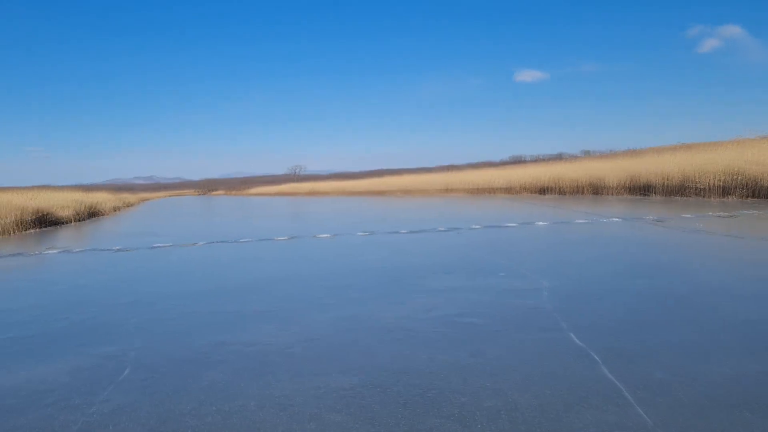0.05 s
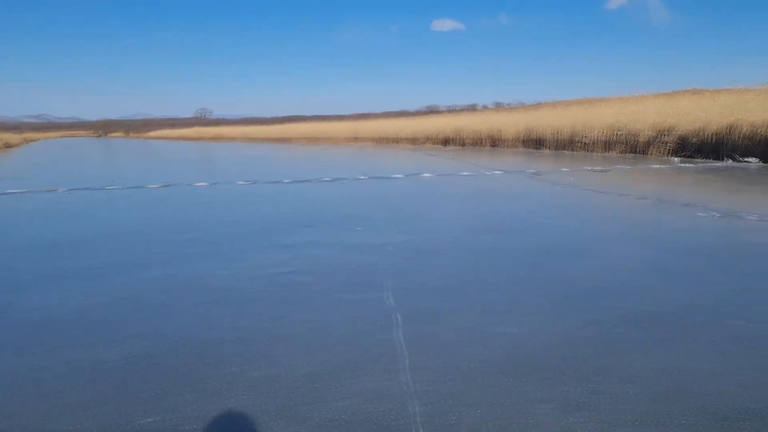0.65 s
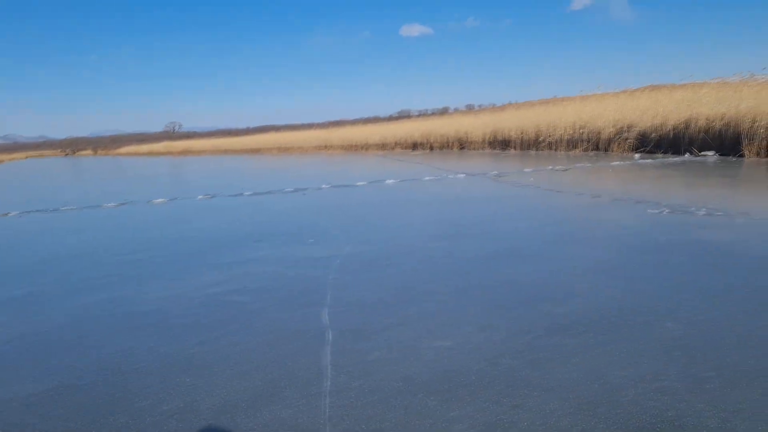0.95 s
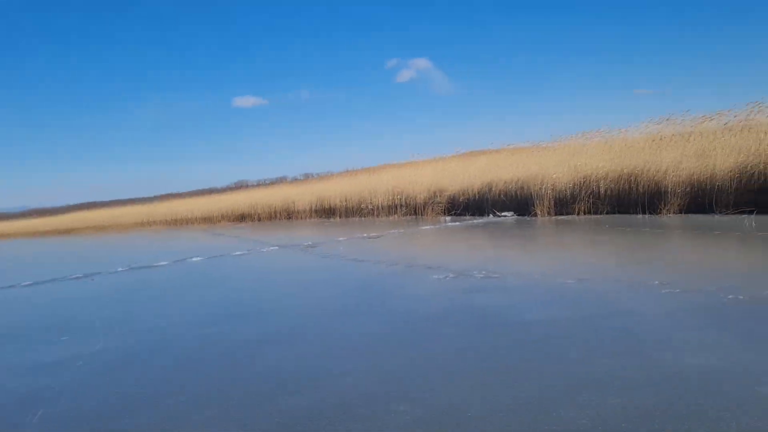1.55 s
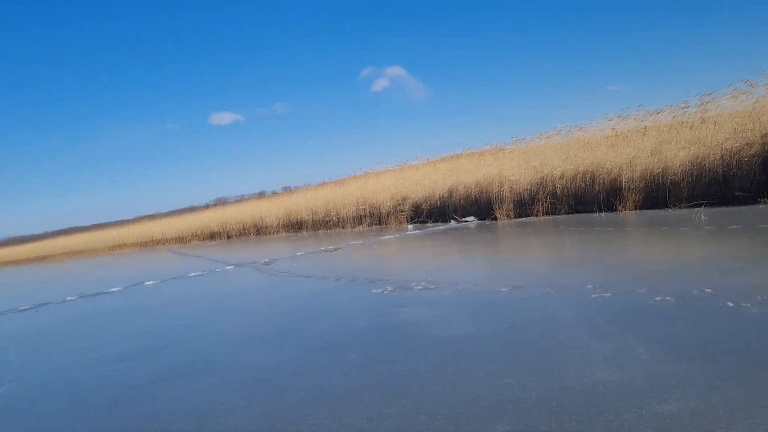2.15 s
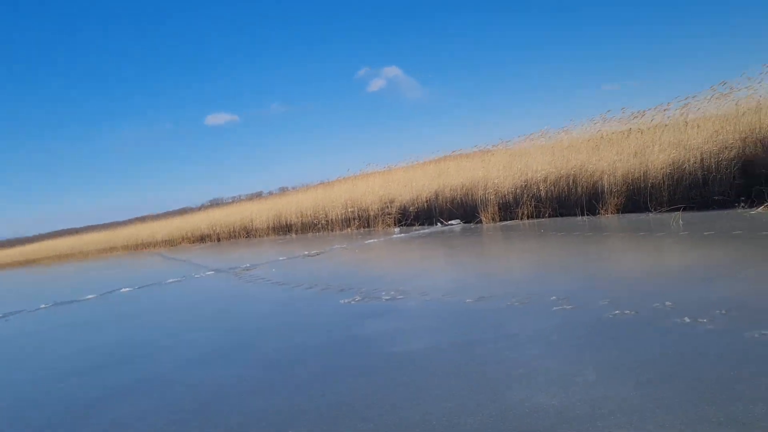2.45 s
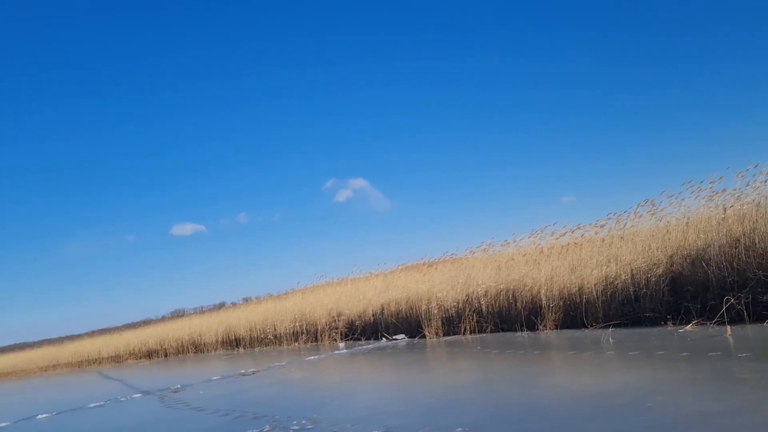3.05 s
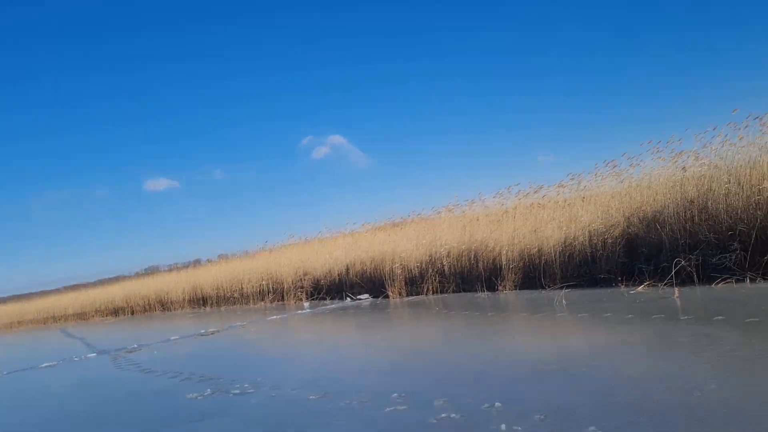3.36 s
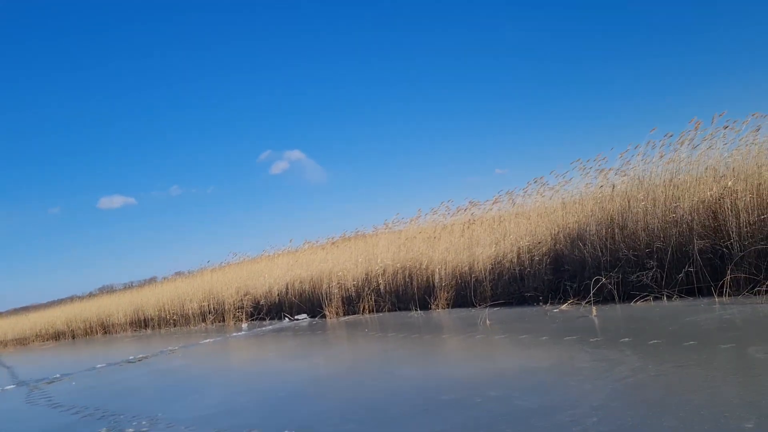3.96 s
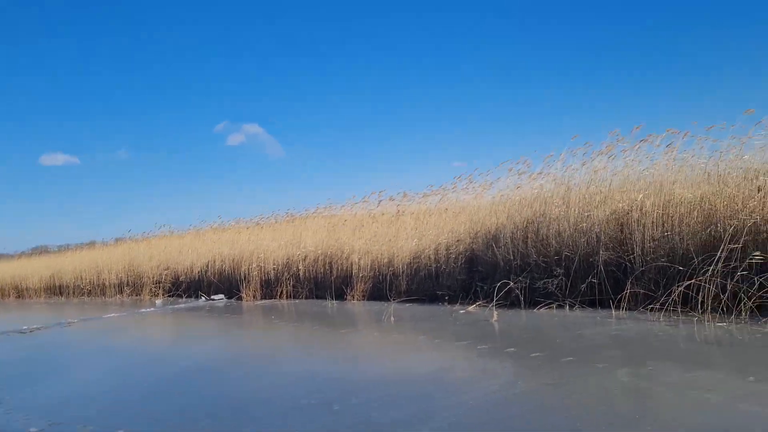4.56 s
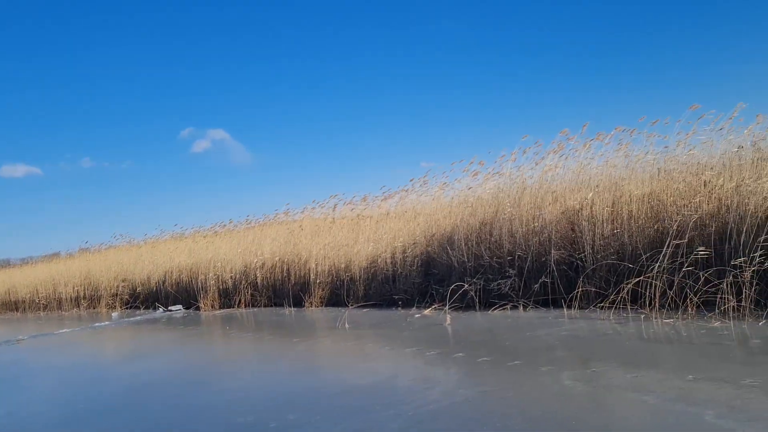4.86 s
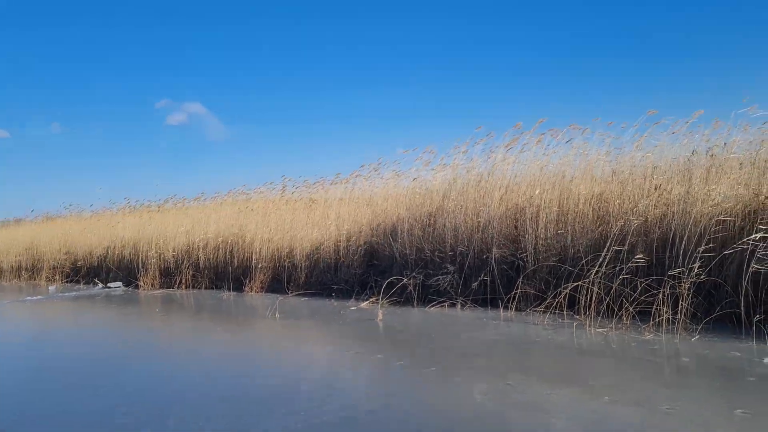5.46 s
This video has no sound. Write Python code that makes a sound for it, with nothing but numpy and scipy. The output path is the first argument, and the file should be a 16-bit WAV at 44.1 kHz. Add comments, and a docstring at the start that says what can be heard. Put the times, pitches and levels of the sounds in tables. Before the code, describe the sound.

Low wind rumbles unevenly on the microphone from the start, with soft thumps around 0.2 and 0.4 seconds, while a nylon jacket swishes close by over a faint open-air hiss. At 1.7 seconds a long-handled tool chops into thin ice: a sharp, loud crack with a crunch and a short, hollow ring. The wind eases, leaving quiet cloth brushes. From about 2.8 to 3.1 seconds the blade bites in a quick run of bright, brittle snaps, loudest at 2.9, scattering small splinters. A sleeve rasps and squeaks softly around 3.5 seconds. The second sharp chop lands at 3.7 seconds, followed at once by a brief hollow note from the ice sheet. Stronger gusts buffet the microphone from 3.9 to 4.6 seconds, thumping hardest near 4.1. Lighter rumble, faint jacket rustles and tiny squeaks continue until about 5.5 seconds.

```python
"""A long-handled tool chops twice into the thin ice of a frozen lake: the edge fractures, the sheet groans
and the impact rings the hollow-sounding modes of the shaft. Between the chops the blade bites and
scrapes, scattering splinters. A nylon jacket swishes, rasps and squeaks by friction with each swing.
Turbulent gusts buffet the two microphone ports over a faint hiss of open air."""
import sys
import numpy as np
from scipy import signal
from scipy.io import wavfile

SR = 44100
rng = np.random.default_rng(int(sys.argv[2]) if len(sys.argv) > 2 else 0)


def dump_mix(stems):
    """Bounce the given channels to the path in sys.argv[1] as a 16-bit WAV at rate SR."""
    frames = np.atleast_2d(stems).T  # one column per channel
    limited = np.clip(frames, -1, 1)  # hard clip at full scale
    pcm = np.round(limited * 32767).astype(np.int16)
    wavfile.write(sys.argv[1], SR, pcm)


N = 242991
T = np.arange(N) / SR
SNAP_RISE_S = 0.0003
RASP_BAND_HZ = [1470, 2600]
# Resonances of splintering ice: centre_hz, width_hz, gain_db
SPLINTER_RESONANCES = [(1000, 600, -8), (1597, 220, 1), (1930, 490, 0), (2600, 1040, -3), (3130, 550, -3.5),
                       (4150, 630, -7), (4800, 770, -10), (6300, 760, -11.5), (7900, 850, -13),
                       (12300, 10000, -21.5)]


def from_db(db):
    """Amplitude ratio of a level in decibels."""
    return 10 ** (np.asarray(db) / 20)


def rms_one(x):
    """Normalisation to unit mean power."""
    return x / np.sqrt(np.mean(x ** 2) + 1e-20)


def in_time(rows):
    """Linear interpolation of each column of a curve at every sample."""
    times, *columns = np.transpose(rows)
    return [np.interp(T, times, column) for column in columns]


def cut(x, hz, kind, order=2):
    """Butterworth filter."""
    sections = signal.butter(order, np.clip(hz, 10, .45 * SR), kind, fs=SR, output="sos")
    return signal.sosfilt(sections, x)


def pan(db):
    """Left and right gains for a level difference."""
    return from_db(np.array([db, -db]).reshape(2, -1) / 2)


def at_ports(x, left_late_s, pan_db):
    """Path difference: a source to one side reaches one port earlier and louder."""
    delays_s = max(left_late_s, 0), max(-left_late_s, 0)
    return np.array([np.roll(x, round(s * SR)) for s in delays_s]) * pan(pan_db)


def drift(rate_hz, step=40):
    """Low-passed noise: a slow random fluctuation of rms 1."""
    r = np.exp(-2 * np.pi * step * rate_hz / SR)
    slow = signal.lfilter([1], [1, -2 * r, r * r], rng.standard_normal(N // step + 2002))[2000:]
    return np.interp(np.arange(N) / step, np.arange(len(slow)), rms_one(slow))


def coloured(spectrum):
    """Noise shaped in half-octave bands, uncorrelated in the two channels; rms 1."""
    edges = 22 * 2 ** np.arange(0, 10, .5)
    hz, db = np.transpose(spectrum)
    white, out = rng.standard_normal((2, 2, N)), 0
    for k, (low, high) in enumerate(zip(edges, edges[1:])):
        gain = from_db(np.interp(np.log(low * high) / 2, np.log(hz), db))
        out += gain * cut(white[k % 2], [low, high], "band")
    return rms_one(out)


def ring(clicks, hz, t60):
    """Damped oscillator: a unit impulse starts a decaying sine of height 1."""
    r, w = np.exp(-np.log(1000) / (t60 * SR)), 2 * np.pi * hz / SR
    return signal.lfilter([0, np.sin(w)], [1, -2 * r * np.cos(w), r * r], clicks + 1e-18)


def resonate(x, resonances):
    """Broad resonators in parallel, signs alternating."""
    out = 0
    for k, (hz, width, db) in enumerate(resonances):
        r = np.exp(-np.pi * width / SR)
        poles = [1, -2 * r * np.cos(2 * np.pi * hz / SR), r * r]
        out += (-1) ** k * from_db(db) * (1 - r * r) / 2 * signal.lfilter([1, 0, -1], poles, x + 1e-18)
    return out


def swell(s, rise, decay, hold=0):
    """Exponential rise to 1 at time s, an optional hold, then exponential decay."""
    return np.exp(-np.clip(np.maximum((s - T) / rise, (T - s - hold) / decay), 0, 40))


def stroke(s, half_length):
    """Gaussian envelope of a movement that speeds up until time s and slows again."""
    return np.exp(-np.minimum(((T - s) / half_length) ** 2 / 2, 40))


def snap(s, decay, resonances):
    """Transient excitation: a sudden noise burst drives resonances; rms about 1 at its peak."""
    shape = swell(s, SNAP_RISE_S, decay)
    burst = resonate(shape * rng.standard_normal(N), resonances)
    return burst * np.sqrt(np.sum(shape ** 2) / np.sum(burst ** 2))


def air(gain_db=6):
    """Noise floor: the open air and the microphone give a faint broadband hiss."""
    # Hiss spectrum: frequency_hz, density_db
    spectrum = [(30, 2), (70, -14), (200, -24), (420, 6), (800, -7), (1200, -10.5), (3000, -9.5),
                (5500, -8.5), (7800, -6.5), (9000, -13), (11700, -5), (16000, -6.5)]
    # Course of the hiss: time_s, level_db
    levels = [(0.0, -55.5), (0.31, -57.5), (0.95, -58.5), (1.61, -57.5), (1.89, -59.5), (2.82, -62),
              (3.01, -54), (3.24, -59), (3.58, -56), (3.76, -61), (4.5, -61), (4.76, -62.5), (5.22, -58.5),
              (5.51, -60)]
    return from_db(in_time(levels)[0] + gain_db) * coloured(spectrum)


def flow_strength(upper, breeze_upper_db=-12, attack_s=0.0047, release_s=0.015):
    """Incoherent sum: breeze and gusts add in energy at each port, for the low or the upper rumble."""
    # Breeze between gusts: time_s, level_db
    breeze = [(0.0, -33.5), (0.36, -35), (0.62, -41.5), (0.96, -61), (1.18, -38.5), (1.43, -38),
              (1.78, -39.5), (2.13, -65), (2.33, -46.5), (2.36, -67.5), (2.63, -67.5), (3.0, -35.5),
              (3.46, -51), (3.66, -44.5), (3.84, -31.5), (4.3, -26), (4.55, -34.5), (4.62, -40.5),
              (4.77, -50.5), (5.0, -40.5), (5.51, -47)]
    # Gusts on the ports: start_s, hold_s, level_db, upper_relative_db, left_minus_right_db
    gusts = [(0.094, 0.094, -30.5, -5.5, -6), (0.35, 0.066, -32, -6, -3.5), (0.566, 0.009, -32.5, -20, -15),
             (0.691, 0.16, -39.5, -39, -6.5), (0.99, 0.011, -37, -11, -10), (1.087, 0.0068, -33.5, -34, -3),
             (1.312, 0.089, -31, -8, -6.5), (1.537, 0.023, -27, -21, 3), (1.872, 0.099, -41.5, -9.5, -1.5),
             (2.105, 0.018, -44.5, -17, -9.5), (2.828, 0.0082, -35.5, -8.5, 1),
             (3.016, 0.18, -35.5, -33, 0.5), (3.301, 0.017, -48, -23, -11), (3.891, 0.11, -33.5, -7, 0),
             (4.055, 0.075, -27, 2, -5), (4.21, 0.13, -33.5, -0.5, 0.5), (4.381, 0.12, -31, -0.5, 1),
             (4.535, 0.039, -34, -5, 4), (4.811, 0.064, -33.5, -14.5, 0.5), (5.049, 0.06, -35, -12, 3.5),
             (5.232, 0.12, -30, -16, -3.5)]
    power = (from_db(in_time(breeze)[0] + upper * breeze_upper_db) * pan(-2.5)) ** 2
    for s, hold, db, upper_db, pan_db in gusts:
        power += (from_db(db + upper * upper_db) * pan(pan_db) * swell(s, attack_s, release_s, hold)) ** 2
    return np.sqrt(power)


def wind(gain_db=1, puffs_per_s=45, puff_decay_s=0.014, steady=0.17, split_hz=240, port_edge_hz=28.6):
    """Turbulent pressure: each port rumbles with its own puffs, which start at once and die away."""
    # Rumble spectrum: frequency_hz, density_db
    spectrum = [(22, -5), (60, 3.5), (100, 1.5), (180, -11.5), (310, -1), (420, -4), (560, -39), (800, -79),
                (1200, -62), (2500, -57.5)]
    hits = (rng.random((2, N)) < puffs_per_s / SR) * rng.uniform(0.34, 1, (2, N))
    puff_energy = signal.lfilter([1], [1, -np.exp(-2 / (puff_decay_s * SR))], hits + 1e-18)
    lumps = rms_one(cut(np.sqrt(steady ** 2 + 2 * puff_energy), 230, "low"))
    flow = cut(coloured(spectrum) * lumps, port_edge_hz, "high")
    low = rms_one(cut(flow, split_hz, "low", order=4)) * flow_strength(upper=False)
    upper = rms_one(cut(flow, split_hz, "high", order=4)) * flow_strength(upper=True)
    return from_db(gain_db) * (low + upper)


def jacket(rustle_db=-66.5, flutter_db=3.5, catch_db=3, firm_db=-41.5, rasp_growth=2.7, muffle_hz=2760):
    """Sliding friction: nylon hisses, and rasps under a firm stroke; the padding absorbs treble."""
    # Nylon friction spectrum: frequency_hz, density_db
    spectrum = [(300, -9), (550, 9), (900, 8.5), (1500, 6.5), (2300, 4), (3100, 6.5), (4500, 1),
                (9000, -9.5), (16000, -55)]
    # Strokes of cloth on cloth: peak_s, half_length_s, level_db
    rubs = [(0.087, 0.044, -56.5), (0.208, 0.023, -46.5), (0.32, 0.098, -53.5), (0.648, 0.019, -49),
            (1.184, 0.054, -55), (1.45, 0.087, -50), (1.53, 0.021, -42), (1.637, 0.018, -44.5),
            (1.979, 0.029, -53), (2.135, 0.0082, -50.5), (2.235, 0.078, -53.5), (2.514, 0.016, -65),
            (2.644, 0.014, -50.5), (3.178, 0.06, -54), (3.331, 0.013, -51.5), (3.41, 0.021, -49.5),
            (3.566, 0.022, -47), (4.124, 0.03, -70), (4.62, 0.021, -51), (5.143, 0.041, -54),
            (5.401, 0.019, -52.5), (5.48, .03, -58)]
    rub_power = sum((from_db(db) * stroke(s, half)) ** 2 for s, half, db in rubs)
    strength = np.sqrt(from_db(rustle_db) ** 2 + rub_power)   # the jacket never lies quite still
    mid, side = coloured(spectrum)
    hiss = (mid + from_db(-1) * side * [[1], [-1]]) * strength * from_db(flutter_db * drift(21.3) - 1)
    rasp = rms_one(cut(rng.standard_normal(N), RASP_BAND_HZ, "band") * from_db(catch_db * drift(250)))
    rasp *= from_db(firm_db - 2) * (strength / from_db(firm_db)) ** rasp_growth
    cloth = hiss + rasp + sleeve()
    sheen = from_db(-8) * cut(cloth, 2500, "high", order=4)
    return cut(cloth, muffle_hz, "low", order=8) + sheen


def scuffs(centre_hz=3800, width_hz=1400, grain_db=3):
    """Abrasion: frost grinds faintly on the ice in a band of grainy noise."""
    # Scuffs on the ice: peak_s, half_length_s, level_db
    passes = [(0.032, 0.025, -54.5), (.082, 0.0084, -50.5), (0.156, 0.0074, -51), (2.278, 0.0098, -56),
              (5.213, 0.081, -60)]
    grind = rms_one(resonate(rng.standard_normal((2, N)), [(centre_hz, width_hz, 0)]))
    envelope = sum(from_db(db) * stroke(s, half) for s, half, db in passes)
    return grind * from_db(grain_db * drift(200)) * envelope


def buffeting(band_hz=(480, 732), level_db=-46, growth=2.1, strong_db=-28):
    """Energy cascade: strong gusts break into finer turbulence, which roars above the rumble."""
    roar = rms_one(cut(rng.standard_normal((2, N)), band_hz, "band", order=4))
    return roar * from_db(level_db) * (flow_strength(upper=True) / from_db(strong_db)) ** growth


def flicks(width_share=0.23, dull_hz=1900):
    """Buckling: a fold of cloth snaps over with a soft, dull pat."""
    # Folds flicking over: start_s, level_db, centre_hz, decay_s
    folds = [(0.206, -33, 900, 0.0075), (0.228, -36.5, 1120, 0.003), (0.275, -42, 900, 0.0019),
             (0.304, -41, 900, 0.0091), (1.133, -40.5, 1050, 0.0025), (1.192, -38.5, 750, 0.006),
             (1.296, -42, 700, 0.0047), (1.884, -41.5, 700, 0.005), (1.934, -44.5, 550, .005),
             (2.195, -34.5, 380, 0.01), (2.32, -43, 567, 0.0024), (3.238, -33, 426, 0.0041),
             (4.931, -45, 750, 0.0025), (5.191, -40, 810, 0.0023)]
    pats = sum(from_db(db) * snap(s + 0.00157, decay, [(hz, width_share * hz, 0)])
               for s, db, hz, decay in folds)
    return at_ports(cut(pats, dull_hz, "low", order=3), .0001, -2.4)


def eddies(arrival_spread_s=0.0017):
    """A vortex has a low-pressure core: it passes each port as one dip with a rebound on either side."""
    # Single eddies: centre_s, frequency_hz, level_db, left_minus_right_db
    vortices = [(0.214, 104, -11, 3), (0.395, 247, -13, 1), (3.504, 300, -26.5, 0), (3.892, 173.5, -19, 0),
                (3.992, 280, -20.5, -12), (4.072, 66, -9.5, -1), (4.081, 310, -7.5, 2),
                (4.1, 396, -15, -10), (4.297, 340, -17, 2), (4.323, 182, -12.5, 2.5), (4.422, 480, -21, -1),
                (4.556, 259, -21, -1), (5.307, 320, -25.5, 5)]
    out = 0
    for s, hz, db, pan_db in vortices:
        distance_squared = (np.pi * hz * (T - s - rng.normal(0, arrival_spread_s, (2, 1)))) ** 2
        pressure = (2 * distance_squared - 1) * np.exp(-np.minimum(distance_squared, 40))
        out += from_db(db) * pan(pan_db) * pressure
    return out


def ribs(ribs_hz):
    """Periodic excitation: the weave sings at the rate its ribs pass, less steadily in a slow slide."""
    # Partials of the weave: harmonic_number, level_db
    harmonics = [(1, -8.5), (2, -4.5), (3, -10.5), (4, -5), (5, -14)]
    waver = np.minimum(.04 * (1050 / ribs_hz) ** 3, .1)
    phase = 2 * np.pi * np.cumsum(ribs_hz * (1 + waver * drift(250))) / SR
    return sum(from_db(db) * np.sin(k * phase) for k, db in harmonics)


def sleeve(catch_db=4, rasp_db=-6, rasp_below_hz=900):
    """Friction on a ribbed surface: short gliding squeaks, and one long slide that rasps as it slows."""
    # Slide of the sleeve in the second swing: time_s, rib_rate_hz, level_db
    swing = [(3.425, 760, -57), (3.443, 880, -43), (3.465, 1270, -55), (3.492, 1400, -42),
             (3.515, 1100, -42.5), (3.54, 900, -35), (3.56, 780, -38.5), (3.585, 700, -44.5),
             (3.612, 970, -44), (3.65, 560, -56)]
    # Squeaks of the weave: peak_s, half_length_s, level_db, rib_rate_hz, glide_octaves_per_s
    squeaks = [(.647, 0.011, -53, 1030, 4), (1.532, .017, -40, 830, -5), (1.642, .011, -48, 850, -5.5),
               (3.907, .014, -48, 850, 5), (3.961, 0.0093, -45, 1100, -6.5), (5.159, 0.025, -57, 860, 5),
               (5.267, 0.015, -55, 1040, 10.5), (5.345, 0.025, -52, 1400, 1.5), (5.455, .011, -55, 1080, 7)]
    ribs_hz, swing_db = in_time(swing)
    rasp = rms_one(cut(rng.standard_normal(N), RASP_BAND_HZ, "band"))
    slide = ribs(ribs_hz) + from_db(rasp_db) * np.minimum(rasp_below_hz / ribs_hz, 1) ** 4 * rasp
    slide *= from_db(swing_db) * (T > swing[0][0]) * (T < swing[-1][0])
    s, half, db, hz, glide = np.transpose(squeaks)
    k = np.searchsorted((s[1:] + s[:-1]) / 2, T)   # the nearest squeak
    squeak_hz = hz[k] * 2 ** np.clip(glide[k] * (T - s[k]), -1, 1)
    squeak = from_db(db[k]) * stroke(s[k], half[k]) * ribs(squeak_hz)
    return at_ports((slide + squeak) * from_db(catch_db * drift(180)), .0001, -0.33)


def chops(push_late_s=0.0011, grip_t60_s=0.2, grain_db=4, crunch_decay_s=0.0064, fizz_db=-46):
    """Impact: ice cracks, crunches and fizzes; the place of contact weights the modes of the shaft."""
    # Blows: start_s, ring_db, crack_db, crunch_db, place (0 = point, 1 = flat edge), brightness_hz
    blows = [(1.7037, -0.5, 3, -15.5, 0.011, 7500), (1.7156, -23, -31, -31, .1, 9000),
             (1.7786, -22.5, -28, -33, 0.08, 15000), (3.6764, -6.5, 2.5, -13.5, 0.88, 11900)]
    # Modes of shaft and ice sheet: pitch_hz, t60_s, point_struck_db, edge_struck_db
    modes = [(203, 0.23, -27.5, -30), (375.4, 0.16, -13, -9), (418, 0.046, -10, -20.5),
             (478, 0.11, -25, -27), (630, 0.12, -8, 0), (903, .19, -21.5, -17.5), (909, 0.14, -32, -1),
             (1182, 0.07, -13.5, -9.5), (1295, 0.085, -11, -18), (1560, 0.049, -11.5, -14),
             (1945, 0.021, -7.5, -16), (2500, 0.045, -23, -20), (2700, 0.038, -22.5, -27.5),
             (3130, 0.026, -22, -23), (3800, 0.04, -20.5, -27)]
    # Resonances of the crack at the edge: centre_hz, width_hz, gain_db
    edge = [(2440, 850, 2), (3160, 550, 7.5), (3780, 780, 2.5), (5380, 870, -5), (7550, 470, -5.5),
            (11800, 3200, -13)]
    # Dull resonances of the ice around the cut: centre_hz, width_hz, gain_db
    crunch = [(280, 540, -5), (750, 370, 3.5), (1430, 480, -6.5), (2550, 300, -14), (5200, 3800, -26)]
    starts, ring_db, _, _, place, _ = np.transpose(blows)
    pushes = np.round((starts + push_late_s) * SR).astype(int)
    out = np.zeros(N)
    for hz, t60, point_db, edge_db in modes:
        clicks = np.zeros(N)
        clicks[pushes] = from_db(ring_db + point_db + place * (edge_db - point_db))
        out -= ring(clicks, hz, min(t60, grip_t60_s))   # the hand damps any longer ring
    crumbs, uneven = 0, rms_one(from_db(grain_db * drift(300)))
    for s, _, crack_db, crunch_db, _, bright_hz in blows:
        contact = from_db(11.5) * resonate(signal.unit_impulse(N, round(s * SR)), edge)
        fracture = from_db(-10.5) * snap(s + 0.000063, 0.00092, edge)
        out += from_db(crack_db) * cut(contact + fracture, bright_hz, "low", order=1)
        out += from_db(crunch_db) * uneven * snap(s + 0.0023, crunch_decay_s, crunch)
        crumbs += from_db(crack_db + fizz_db) * swell(s, rise=0.0087, decay=0.04)
    fizz = crumbs * rms_one(resonate(rng.standard_normal((2, N)), SPLINTER_RESONANCES))
    return at_ports(cut(out, 110, "high"), .00034, -3.5) + fizz


def groans():
    """Flexural vibration: each time the ice sheet bends it sounds one short, hollow note."""
    # Notes of the sheet: peak_s, pitch_hz, level_db, rise_s, decay_s
    notes = [(2.931, 410, -25, 0.015, 0.0038), (1.742, 330, -22, 0.0073, 0.025),
             (3.718, 339, -12, 0.0046, 0.011)]
    out = sum(from_db(db) * swell(s, rise, decay) * np.sin(2 * np.pi * hz * (T - s))
              for s, hz, db, rise, decay in notes)
    return at_ports(out, 0.00053, -1.7)


def brushes(width_share=0.31, dull_hz=2600):
    """Light friction: padded cloth brushes past with a hollow puff of narrow-band noise."""
    # Brushes of cloth: peak_s, half_length_s, level_db, centre_hz
    touches = [(2.18, 0.011, -52, 790), (2.244, 0.011, -46.5, 670), (2.271, 0.0038, -43.5, 565),
               (2.275, .006, -48, 1920), (2.51, 0.0082, -49, 1000), (2.658, 0.013, -50, 715),
               (2.698, 0.0072, -47.5, 412), (2.776, 0.009, -53.5, 640), (3.209, 0.0061, -46.5, 650)]
    out = 0
    for s, half, db, hz in touches:
        puff = rms_one(resonate(rng.standard_normal(N), [(hz, width_share * hz, 0)]))
        out += from_db(db) * stroke(s, half) * puff
    return at_ports(cut(out, dull_hz, "low", order=4), .0001, -1)


def creak(peak_s=2.43, level_db=-60.5, slips_per_s=190, jitter=0.053, centre_hz=900, width_hz=600):
    """Stick-slip motion: taut cloth gives way in a faint run of tiny ticks."""
    cycles = np.cumsum(slips_per_s * (1 + jitter * drift(30))) / SR
    slips = np.diff(np.floor(cycles), prepend=0)
    ticks = rms_one(cut(resonate(slips, [(centre_hz, width_hz, 0)]), 1700, "low"))
    return at_ports(from_db(level_db) * stroke(peak_s, half_length=0.066) * ticks, .0001, 0)


def blade(splinters_per_s=2000, grit_edge_hz=1900, skitter_db=-8.5, scatter_db=-5):
    """Brittle fracture: each bite snaps off a ringing shard and scatters splinters to all sides."""
    # Bites: start_s, snap_db, decay_s, low_edge_hz, shard_hz, shard_db, grit_db
    bites = [(2.8444, -16, 0.0021, 1230, 3450, -23, -28), (2.8545, -34, .003, 3000, 4900, -38, -40),
             (2.886, -39, .002, 1800, 4300, -42, -46), (2.9315, -7.5, 0.0033, 3000, 4150, -5, -22),
             (2.9408, -22, 0.0042, 2500, 4370, -23, -36), (3.005, -22, 0.0053, 1800, 4150, -20.5, -31.5),
             (3.0157, -28.5, .004, 1400, 3700, -36, -44), (3.062, -28, 0.0028, 890, 4060, -43, -55),
             (3.11, -28.5, 0.0029, 900, 4100, -50, -59)]
    breaks, trail_power = 0, 0
    for s, db, decay, edge_hz, shard_hz, shard_db, grit_db in bites:
        breaks += from_db(db - 3) * cut(snap(s + 0.00085, decay, SPLINTER_RESONANCES), edge_hz, "high")
        shard = swell(s + 0.0019, rise=0.00048, decay=0.00078) * np.sin(2 * np.pi * shard_hz * (T - s))
        breaks += from_db(shard_db) * shard
        # splinters burst out behind the bite, and some slide on over the ice
        burst, skitter = (swell(s + 0.001, rise=0.0012, decay=fall_s) for fall_s in (0.008, 0.071))
        trail_power += from_db(grit_db + 2) ** 2 * (burst ** 2 + (from_db(skitter_db) * skitter) ** 2)
    # three streams of splinters: at the blade, to the left, to the right
    sizes = from_db(4.5 * np.minimum(rng.exponential(1, (3, N)), 4)) * rng.choice([-1, 1], (3, N))
    hits = rng.random((3, N)) < splinters_per_s / SR
    splinters = resonate(sizes * hits, SPLINTER_RESONANCES)
    grit = rms_one(cut(splinters, grit_edge_hz, "high", order=1)) * np.sqrt(trail_power)
    return at_ports(breaks + .5 * grit[0], -0.00026, 5.5) + from_db(scatter_db) * grit[1:]


def scene():
    """Superposition: tool and ice in front, the jacket close by, wind on the ports."""
    ice = chops() + blade() + scuffs() + groans()
    return ice + wind() + buffeting() + eddies() + jacket() + flicks() + brushes() + creak() + air()


def record(dry, cutoff_hz=16000):
    """Saturation rounds the hardest peaks, and a steep low-pass limits the bandwidth."""
    limited = dry / (1 + dry ** 8) ** (1 / 8)
    return signal.sosfilt(signal.ellip(10, .2, 70, cutoff_hz, fs=SR, output="sos"), limited)


dry = scene()
out = record(dry)
dump_mix(out)
```